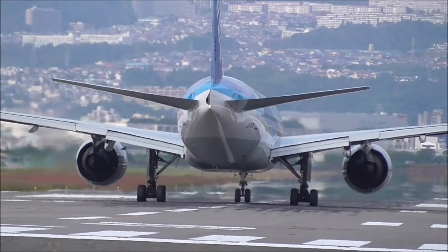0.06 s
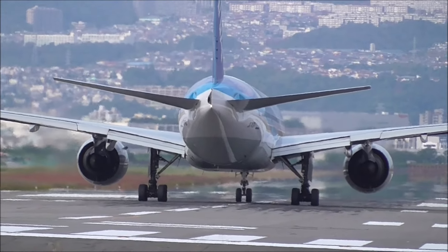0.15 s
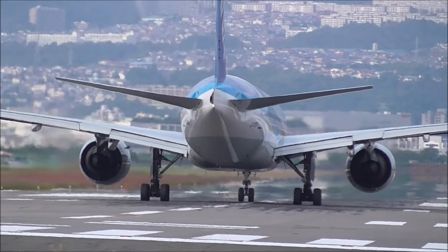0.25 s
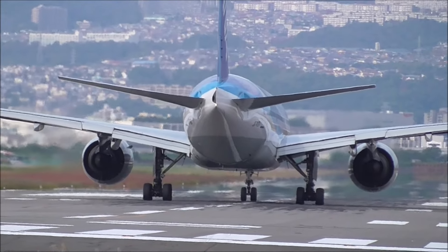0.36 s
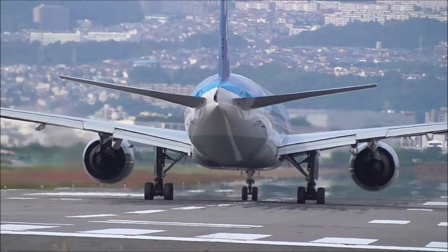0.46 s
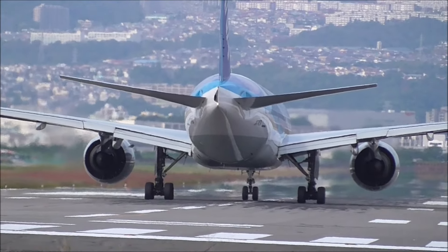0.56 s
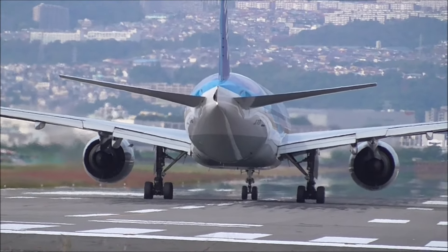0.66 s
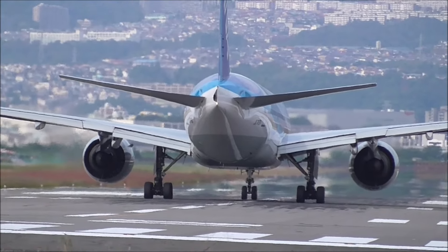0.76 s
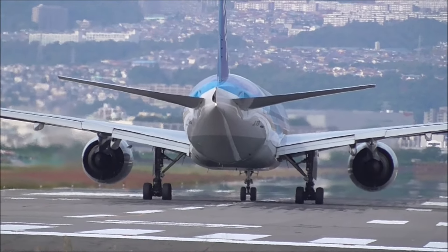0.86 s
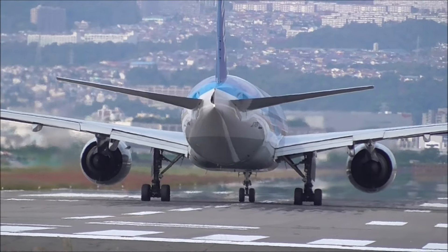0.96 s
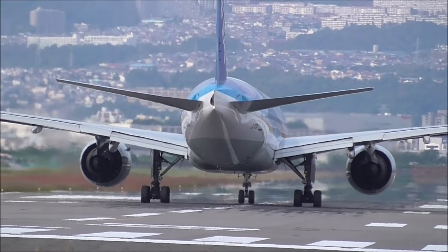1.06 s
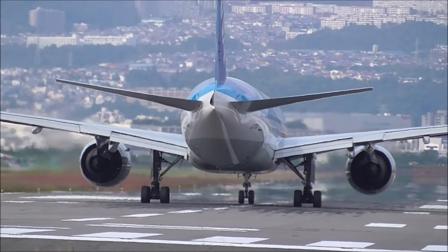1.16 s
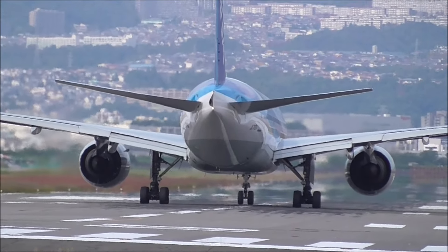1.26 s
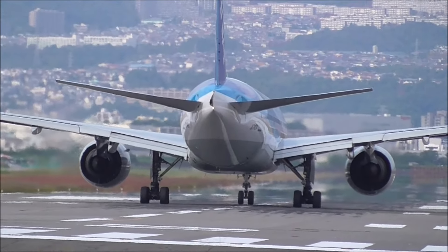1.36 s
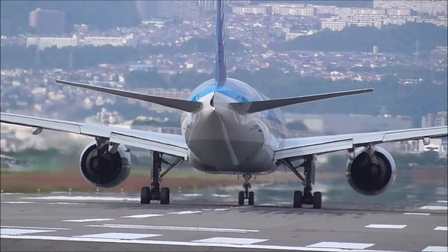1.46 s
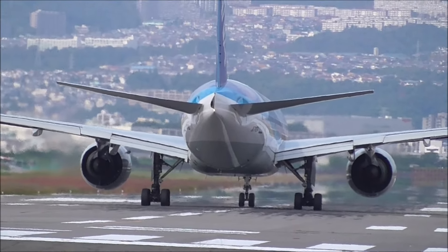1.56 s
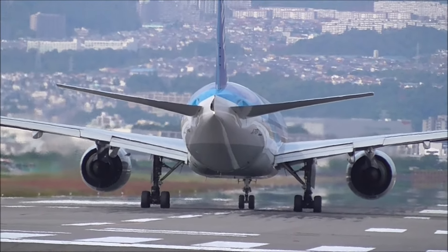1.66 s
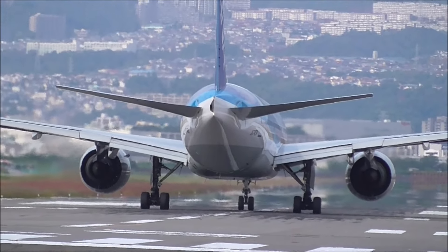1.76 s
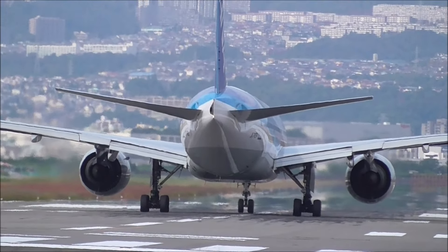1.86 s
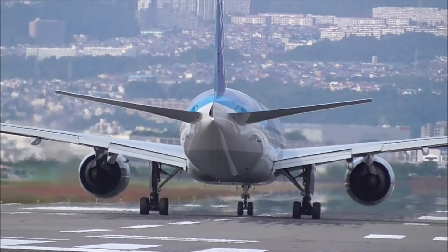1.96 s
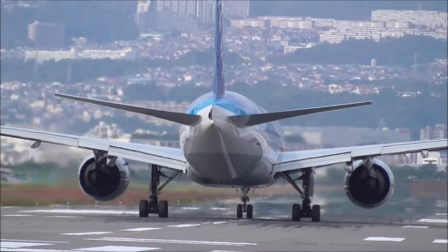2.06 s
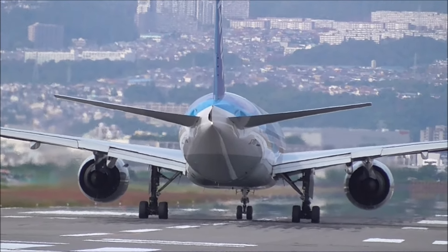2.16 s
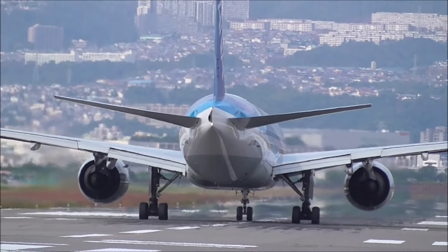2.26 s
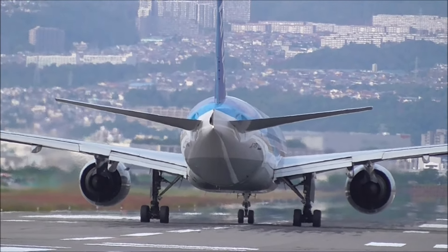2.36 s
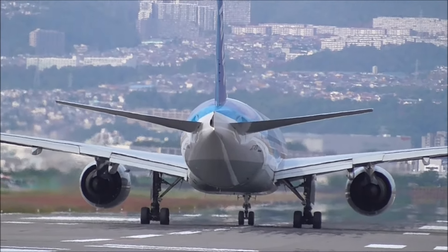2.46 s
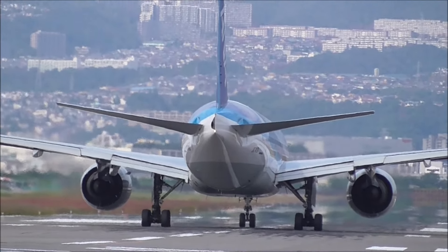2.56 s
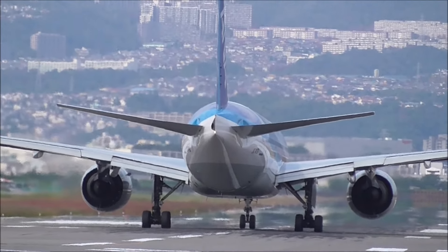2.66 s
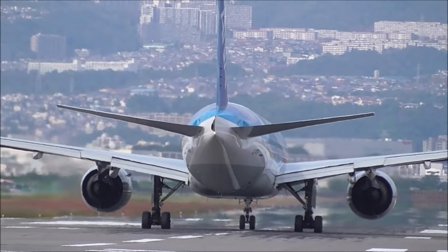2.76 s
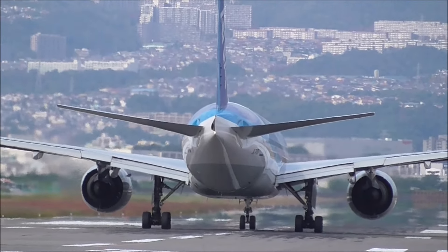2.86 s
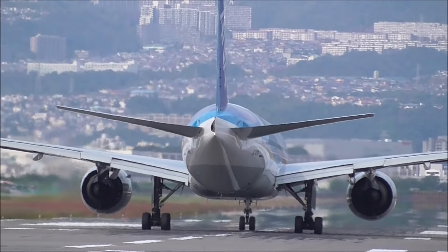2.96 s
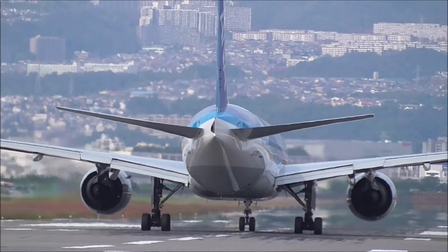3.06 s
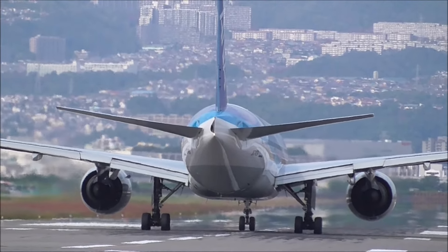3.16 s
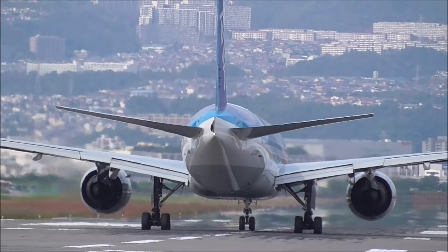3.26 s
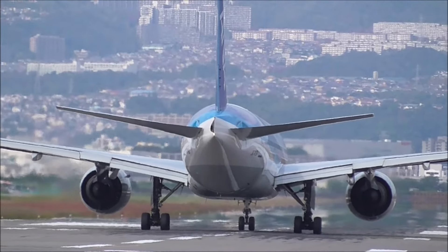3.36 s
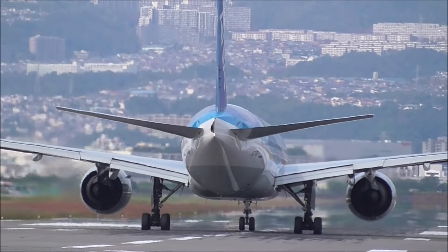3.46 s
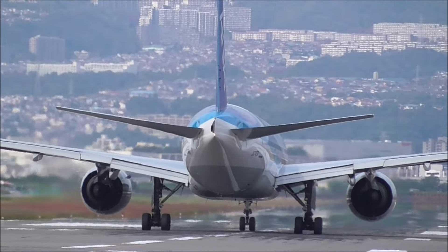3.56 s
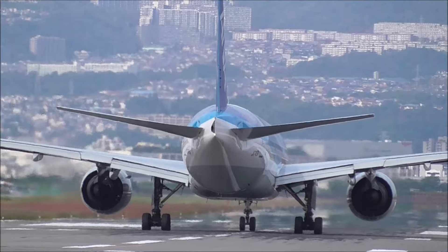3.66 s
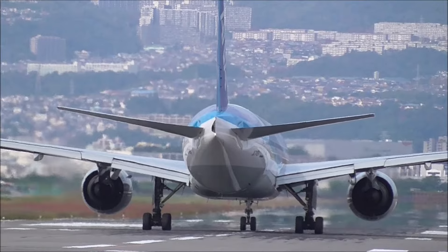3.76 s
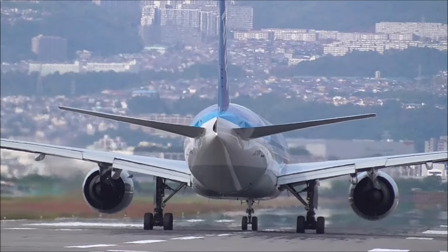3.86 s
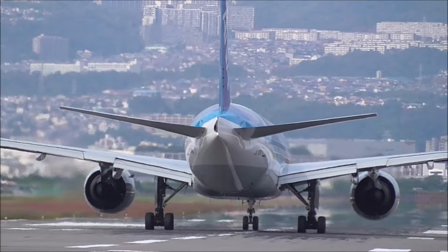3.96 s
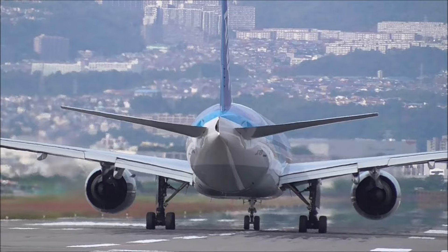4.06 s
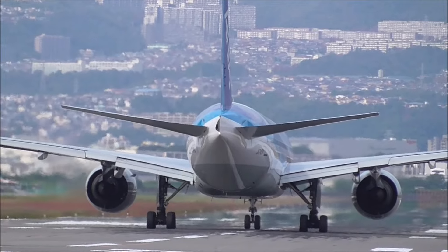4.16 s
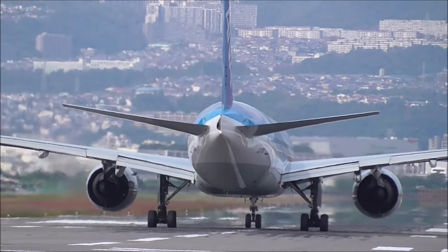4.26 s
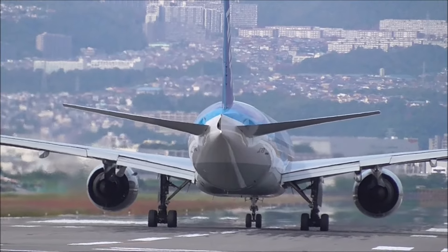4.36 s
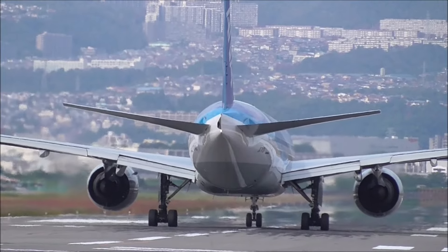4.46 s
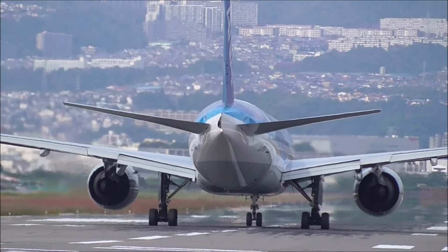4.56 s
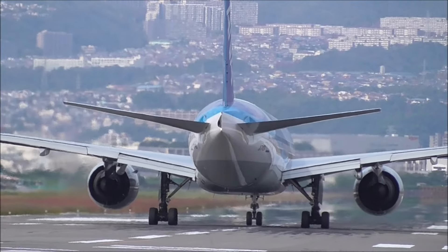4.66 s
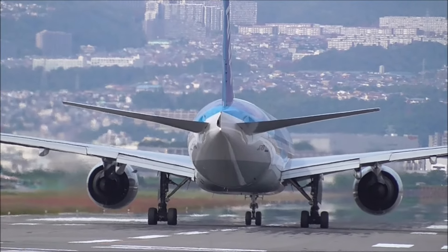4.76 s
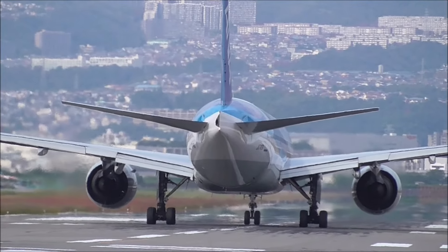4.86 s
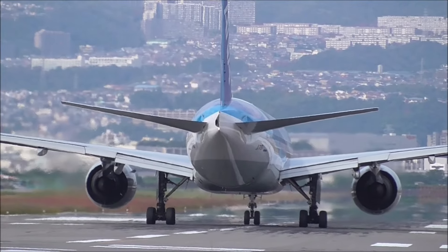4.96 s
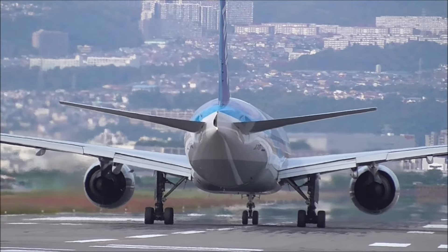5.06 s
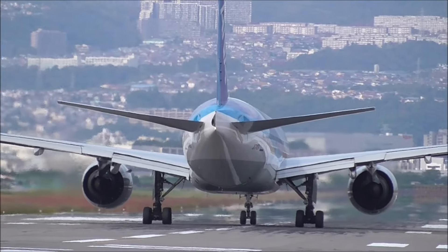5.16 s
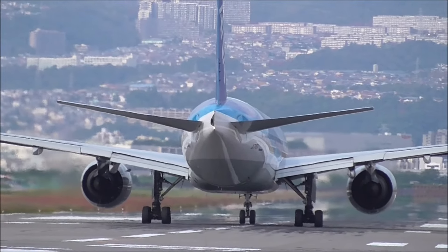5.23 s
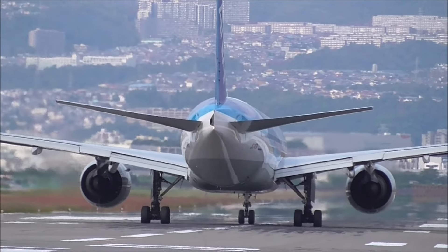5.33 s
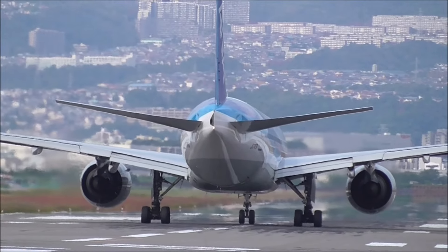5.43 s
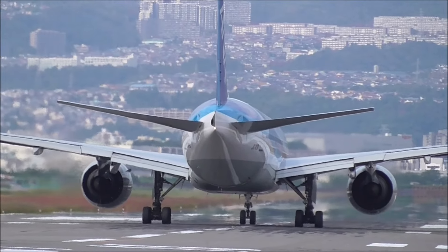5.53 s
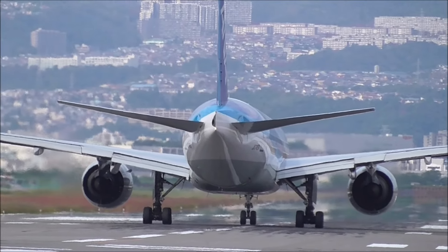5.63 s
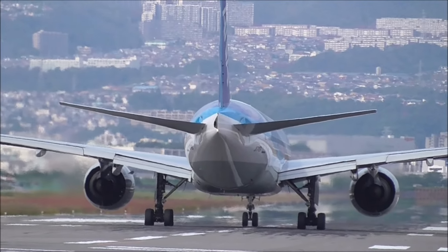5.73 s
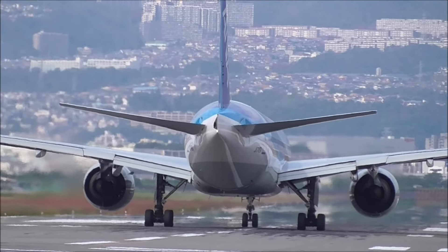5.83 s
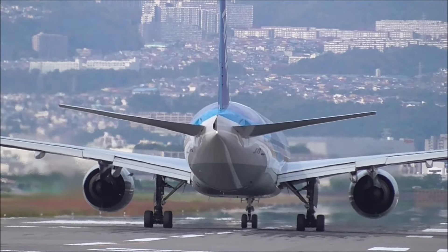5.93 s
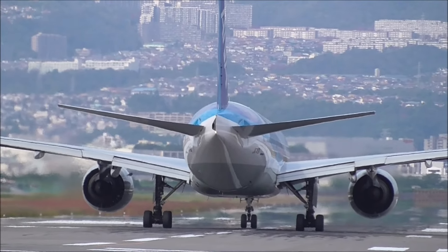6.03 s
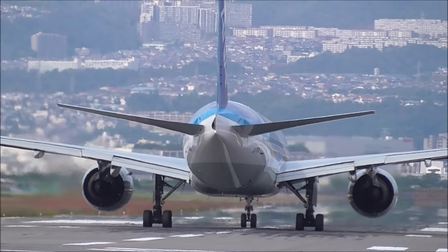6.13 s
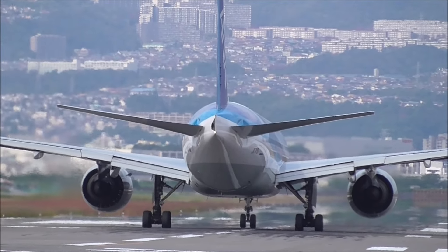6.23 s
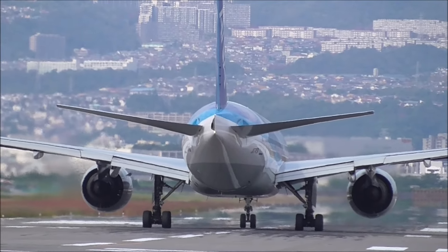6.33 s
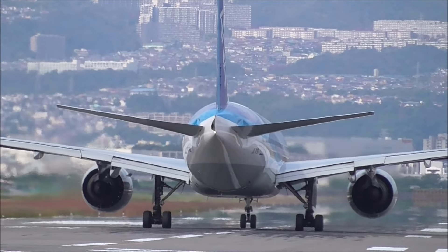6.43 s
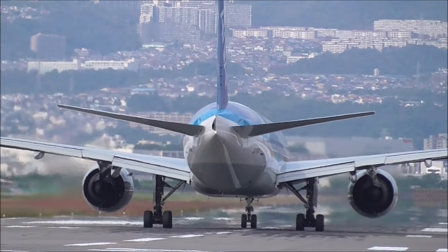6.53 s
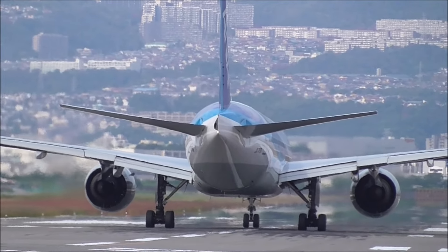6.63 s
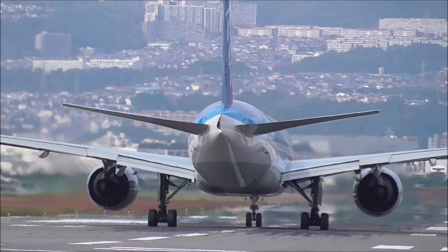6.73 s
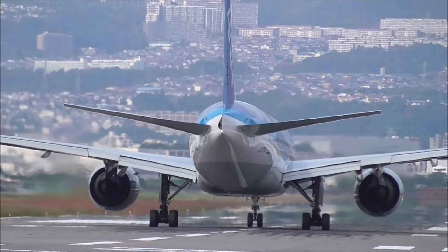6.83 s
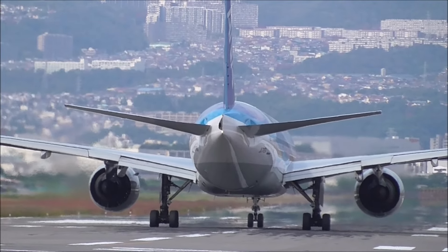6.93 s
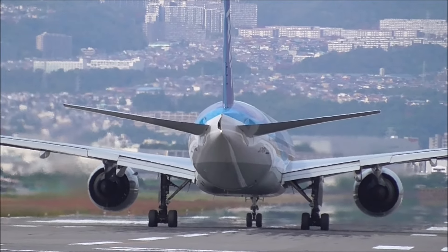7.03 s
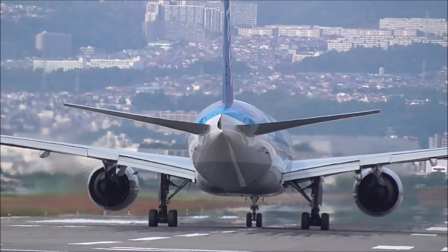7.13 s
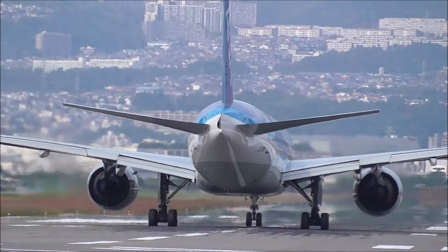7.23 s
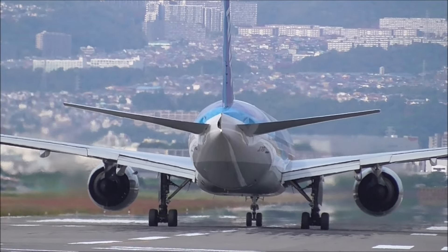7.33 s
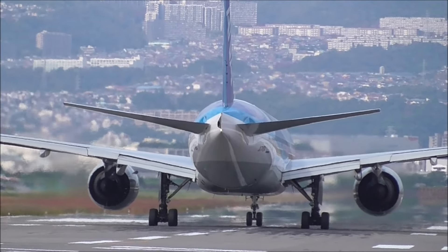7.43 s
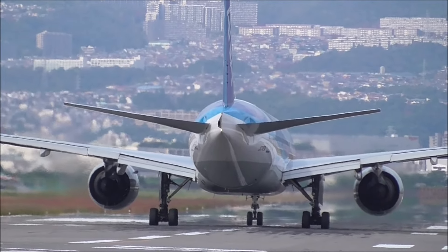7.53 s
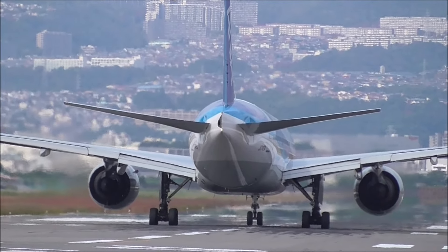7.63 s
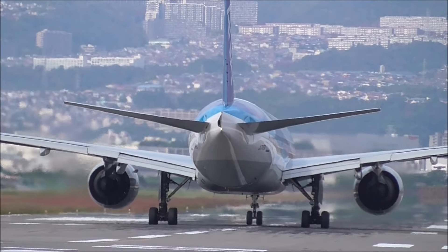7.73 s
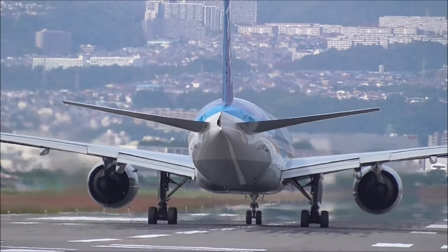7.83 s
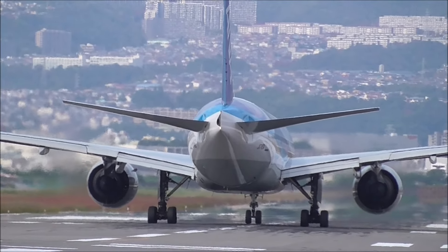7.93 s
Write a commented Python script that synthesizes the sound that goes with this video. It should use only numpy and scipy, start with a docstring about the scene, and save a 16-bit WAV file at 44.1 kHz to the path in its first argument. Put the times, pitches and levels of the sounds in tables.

```python
"""A runway, heard from far behind a twin-engine airliner that lines up and begins to spool up.
Each engine drones on a fundamental and its octave, the two slightly apart in pitch, over filtered-noise
exhaust roar; a lower howl breaks out late, and a faint turbine whine climbs as the roar swells.
Close to, gusts and single eddies buffet mostly the left microphone port, something ticks lightly,
and a faint steady hiss lies under it all."""
import sys
import numpy as np
from scipy import signal
from scipy.fft import rfft, irfft, next_fast_len
from scipy.io import wavfile
from scipy.ndimage import uniform_filter1d, map_coordinates

SR = 44100
rng = np.random.default_rng(int(sys.argv[2]) if len(sys.argv) > 2 else 0)


def log_audio(samples):
    """Write samples as a 16-bit WAV file to the path given in sys.argv[1]."""
    # one column per channel
    frames = np.atleast_2d(samples).T
    # limit to full scale, then quantise
    limited = np.clip(frames, -1, 1)
    pcm = np.round(limited * 32767).astype(np.int16)
    wavfile.write(sys.argv[1], SR, pcm)


N = 352359

# Noise colours, far sources and hiss: [f/Hz, relative level/dB]
HISS_COLOUR = [(3000, -2.8), (6200, -2.5), (7200, 3.2), (8400, 3.4), (9400, 4.6), (10400, 4.6), (11200, 1),
               (13200, 3.9), (14200, -0.3), (15700, -2)]
DEEP_COLOUR = [(15, -36.5), (28, -19), (42, -9), (60, -1), (85, 1), (115, 2), (160, -0.5), (250, -10),
               (600, -45), (1800, -90)]
RUMBLE_COLOUR = [(30, -40), (80, -18.5), (130, -5), (170, 0), (220, 1.5), (290, -1.4), (380, -4.7),
                 (480, -9.2), (700, -29.5), (1200, -73.5)]
ROAR_COLOUR = [(250, -36), (400, -11.5), (490, -4.5), (590, -0.5), (660, 0.5), (720, -5.2), (810, -8.5),
               (900, -18.2), (1050, -34.5), (1800, -67.5)]
FAN_COLOUR = [(600, -23.5), (900, -2.5), (1030, -3), (1380, 1), (1510, 0), (1700, -5.5), (2000, -0.5),
              (2240, -3.2), (2400, -9.5), (2750, -10.5), (3050, -5.5), (3500, -7), (4400, -15.3),
              (5200, -21.5), (6200, -41)]
# Noise colours, close to the microphone: [f/Hz, relative level/dB]
BREEZE_COLOUR = [(15, -27.5), (35, -11.5), (70, -0.5), (120, 3.5), (170, 4.5), (260, -4.5), (400, -7),
                 (650, -21), (1200, -58)]
GUST_COLOUR = [(15, -30.5), (50, -11), (110, -10.5), (240, 1.5), (340, -2), (500, -14.5), (720, -19.5),
               (1000, -27), (2000, -68)]
TICK_COLOUR = [(1500, -35), (2800, -11), (3400, 7), (4000, -4), (4600, -3), (5300, -18), (6200, -22),
               (7800, -13.5), (10000, -25), (15000, -33)]

# Likeness of the two ports; below 0 they move in opposite senses: [f/Hz, correlation]
PORT_LIKENESS = [(50, 0.97), (300, 0.95), (650, 0.98), (1050, 0.81), (1500, 0.9), (2100, 0.96),
                 (2500, 0.86), (3100, 0.97), (3600, 0.88), (4300, 0.43), (4900, -0.22), (6500, -0.9),
                 (7300, -0.19), (8200, -0.42), (9300, .5), (11500, .3), (13000, .2), (15000, .2)]
# Level difference between the ports: [f/Hz, left minus right level/dB]
PORT_LEAN = [(100, -0.5), (320, -0.4), (560, -2.4), (800, -1.4), (1300, -2.4), (2500, 0), (4500, 3),
             (8000, -1), (13000, 0)]
# Phase difference between the ports: [f/Hz, lead of the left/rad]
PORT_SKEW = [(60, 0), (350, -0.19), (900, -0.06), (1300, .18), (2100, 0.087), (3000, 0), (3800, -0.075),
             (4300, 0.88), (5000, -0.11)]

# Light ticks near the microphone: [t/s, nominal peak level/dB, ring against scrape level/dB]
TICKS = [(4.8636, -33, -12), (5.8546, -38, -4), (5.8754, -29.5, 2.5)]
# Gusts at the microphone: [start t/s, hold t/s, buffet level before the port gains/dB]
GUSTS = [(0.12, 0.45, -48), (0.35, 0.2, -38.5), (0.84, 0.8, -49), (1.53, 0.08, -44), (1.7, 0.17, -44),
         (2.06, 0.06, -45), (2.22, 0.2, -49), (3.46, 0.2, -43), (3.8, 0.15, -46), (3.98, 0.27, -41),
         (4.45, 0.42, -40), (5.1, 0.7, -38.5), (5.271, 0.07, -34.5), (5.44, 0.16, -43), (5.86, 0.2, -47),
         (6.49, 0.04, -43), (6.68, 0.1, -45), (6.78, 0.04, -37), (6.96, 0.24, -38.5), (7.301, 0.3, -36.5),
         (7.66, 0.33, -50)]
# Single eddies that thump the ports: [t/s, peak level on the left/dB, width t/s]
EDDIES = [(1.57, -28, .002), (3.509, -26.5, .0019), (3.625, -25, .0019), (3.654, -28.5, .0018),
          (3.838, -29, .0018), (3.968, -28.5, .0018), (4.266, -22.5, .0021), (4.753, -28, .0015),
          (4.87, -27, .0014), (5.212, -24, .0009), (5.259, -19, .0009), (5.267, -16.5, .0007),
          (5.2953, -11.8, .00087), (5.3068, -16.5, .001), (5.324, -19, .00069), (5.33, -20, .0007),
          (5.581, -24, .0009), (5.635, -16, .00096), (5.64, -18.5, .0009), (5.662, -23, .001),
          (5.715, -21, .0007), (5.7725, -18, .0013), (5.779, -19.5, .001), (5.804, -22, .001),
          (6.503, -26, .0015), (6.783, -22, .0016), (6.796, -24.5, .0014), (6.823, -25.5, .0014)]

# Surges of the deep rumble: [peak t/s, half length t/s, peak level/dB]
SURGES = [(1.64, 0.1, -46), (2.9, 0.2, -52), (3.96, 0.05, -44), (4.11, 0.04, -44)]
# Reference level for the mid roar and the drones' octaves: [t/s, level/dB]
ROAR_LEVEL = [(0, -41.2), (0.3, -44.0), (0.8, -42.1), (1.8, -40.5), (2.25, -43.2), (3.15, -40.3),
              (3.7, -42.8), (4.6, -41.2), (5.45, -43.2), (6.0, -40.8), (6.6, -39.2), (7.1, -35),
              (7.65, -32.6), (7.98, -32.9)]
# Level laws of the layers: [idle level/dB, gain by lining up/dB, gain by spooling up/dB]
RUMBLE_LAW = (-47.5, 5.5, 8.6)
FAN_LAW = (-52, 1.3, 3.6)
HUM_LAW = (-52.3, 1.3, 2.6)
WHINE_LAW = (-70.5, 6.5, 5.5)
# Engine drones by name: [idle f/Hz, sag with spool f/Hz, level law of the fundamental/dB,
# octave against the roar reference level/dB]
DRONES = {"first": (320.9, 3.4, (-52.3, -1.2, 10), -4.4), "second": (327.1, 3.5, (-54.5, 3, -2), -15)}
# Swells of a drone's partials: [drone, partial 1 or 2, peak t/s, half length t/s, peak level/dB]
SWELLS = [("first", 1, 0.7, 0.25, -54), ("second", 1, 1.9, 0.3, -53), ("second", 2, 1.78, 0.18, -46),
          ("first", 1, 2.66, 0.2, -47), ("first", 1, 3.0, 0.12, -48), ("second", 2, 3.1, 0.2, -44),
          ("howl", 2, 3.5, 0.55, -51), ("second", 1, 3.76, 0.36, -43.5), ("second", 1, 4.75, 0.5, -44.3),
          ("second", 1, 5.28, 0.22, -44.5), ("second", 2, 6.25, 0.45, -44.5),
          ("first", 1, 6.44, 0.22, -36.3), ("first", 1, 6.73, 0.08, -37), ("second", 1, 6.85, 0.3, -47),
          ("first", 1, 6.9, 0.095, -31), ("first", 1, 7.305, 0.075, -26), ("first", 1, 7.44, 0.105, -27),
          ("howl", 1, 7.635, 0.075, -28.5), ("first", 1, 7.75, 0.1, -34), ("first", 1, 7.95, 0.15, -30.5),
          ("howl", 1, 7.865, 0.045, -31), ("howl", 1, 7.97, 0.07, -27.5)]

LINE_UP_S = 6.1  # over this time the tail swings slowly towards the listener
THROTTLE_S, SPOOL_S = 6.05, 1.9  # the throttles open; spool speed goes from 0 to 1 over SPOOL_S
WHINE_HZ, WHINE_RISE_HZ = 1461, 175  # pitch at idle, and its rise with spool speed
DRIFT_HZ, DRIFT_KNOTS_PER_S = 0.25, 1.5  # slow wander of each engine's pitch
HOWL_HZ, HOWL_BEND_HZ, HOWL_BEND_S = 282.3, 4.2, 0.2
HOWL_START_S, HOWL_ATTACK_S = 7.59, 0.05
HOWL_OCTAVE_DB, HOWL_FADE_DB_PER_S = -30.5, 6
GUST_ATTACK_S, GUST_RELEASE_S, CALM_DB = 0.045, 0.03, -63
EDDY_RIGHT_DB, EDDY_WIDE_S = -9, 0.002  # right port against left, for an eddy of this width
TICK_RING_HZ, TICK_RISE_S = 3450, 0.002
TOP_HZ = 15720


def amp(db):
    """Decibels to gain."""
    return 10 ** (np.asarray(db) / 20)


def unit(x):
    """Scale to rms 1."""
    return x / np.sqrt(np.mean(x ** 2) + 1e-20)


def times():
    """The time of every sample, in seconds."""
    return np.arange(N) / SR


def ramp(start_s, length_s):
    """0 before start_s, then a straight climb to 1."""
    return np.clip((times() - start_s) / length_s, 0, 1)


def bell(peak_s, half_s):
    """A smooth swell that reaches 1 at peak_s."""
    return np.exp(-((times() - peak_s) / half_s) ** 2)


def along(points, hz):
    """(f/Hz, value) points read on a log frequency axis."""
    f, value = np.transpose(points)
    return np.interp(np.log(hz + 1), np.log(f + 1), value)


def wobble(rate):
    """A smooth random curve with rate knots a second."""
    knots = rng.standard_normal(4096)
    coarse_samples = np.arange(0, N, 32)
    coarse = map_coordinates(knots, [coarse_samples * rate / SR], mode="wrap")
    return np.interp(np.arange(N), coarse_samples, coarse)


def filtered(x, response):
    """x with its spectrum multiplied by a response of frequency."""
    size = next_fast_len(N + SR // 4)
    hz = np.fft.rfftfreq(size, 1 / SR)
    return irfft(rfft(x, size) * response(hz), size)[..., :N]


def noise(colour):
    """Two unrelated coloured noises of rms 1."""
    white = rng.standard_normal((2, N))
    return unit(filtered(white, lambda hz: amp(along(colour, hz))))


def turbulence(colour, patchy_db, frames=14):
    """Stereo noise of rms 1; moving air lifts and sinks patches of its spectrum, each frames long."""
    spectrum = signal.stft(noise(colour), nperseg=1024)[2]
    field = rng.standard_normal(spectrum.shape[1:])
    field = uniform_filter1d(field, size=7, axis=0)
    field = uniform_filter1d(field, size=frames, axis=1)
    pair = signal.istft(spectrum * amp(patchy_db * unit(field)), nperseg=1024)[1][:, :N]

    def mid_side_gains(hz):
        # this split gives the two ports their likeness as a correlation
        angle = np.arccos(np.clip(along(PORT_LIKENESS, hz), -1, 1)) / 2
        return np.array([np.cos(angle), np.sin(angle)])

    mid, side = filtered(pair, mid_side_gains)
    return unit(np.array([mid + side, mid - side]))


def hiss():
    """Faint steady hiss: high coloured noise with slight spectral patches."""
    return amp(-68.2) * turbulence(HISS_COLOUR, patchy_db=0.5)


def ticks():
    """Light taps close by: a noise scrape and a short sine ring swell and die within milliseconds."""
    t = times()
    scrape, ring = np.zeros(N), np.zeros(N)
    for s, db, ring_db in TICKS:
        age = np.maximum(t - s, 0) / TICK_RISE_S
        # noise peaks stand well above its rms, so the envelope sits lower
        envelope = amp(db - 12.3) * age * np.exp(1 - age)
        scrape += envelope
        ring += amp(ring_db) * envelope
    return scrape * noise(TICK_COLOUR) + ring * np.sin(2 * np.pi * TICK_RING_HZ * t)


def gust_level():
    """The wind's dB over time: each gust rises, holds and dies away over a faint breeze."""
    power = amp(CALM_DB) ** 2
    for s, hold_s, db in GUSTS:
        rise = ramp(s - GUST_ATTACK_S, GUST_ATTACK_S)
        fade = np.exp(-np.maximum(times() - s - hold_s, 0) / GUST_RELEASE_S)
        power = power + (amp(db) * rise * fade) ** 2
    return 10 * np.log10(power)


def buffeting():
    """Wind noise, mostly on the left port; harder gusts move from the breeze's colour to the gust's."""
    wind_db = gust_level()
    hard = np.clip((wind_db + 39.5) / 9, 0, 1)
    flow = np.sqrt(1 - hard) * noise(BREEZE_COLOUR) + np.sqrt(hard) * noise(GUST_COLOUR)
    port_gains = amp([[1.5], [-8]])  # left, right
    return amp(wind_db + 1.8 * wobble(45)) * flow * port_gains


def eddies():
    """Each passing eddy is one push of pressure between two suctions; wider ones reach the right more."""
    t = times()
    thumps = np.zeros((2, N))
    for s, db, width in EDDIES:
        u = (t - s) / width
        near = np.abs(u) < 6
        push = (1 - u[near] ** 2) * np.exp(-u[near] ** 2 / 2)
        right = amp(EDDY_RIGHT_DB) * (width / EDDY_WIDE_S) ** 2
        thumps[:, near] += np.array([[1], [right]]) * amp(db) * push
    return thumps


def wind():
    """Air at the microphone: broad buffeting plus the thumps of single eddies."""
    return buffeting() + eddies()


def spool():
    """Engine speed, climbing steadily from 0 at idle to 1."""
    return ramp(THROTTLE_S, SPOOL_S)


def level(law):
    """A layer's dB over time: it shifts as the tail swings round and as the engines spool up."""
    idle_db, line_up_db, spool_db = law
    return idle_db + line_up_db * ramp(0, LINE_UP_S) + spool_db * spool()


def roar_level():
    """The roar reference dB at every sample."""
    return np.interp(times(), *np.transpose(ROAR_LEVEL))


def deep_rumble():
    """The lowest exhaust noise wanders in level, with brief surges added in power."""
    surges = sum(amp(db) * bell(s, half_s) for s, half_s, db in SURGES)
    gain = np.hypot(amp(-47.8 + 0.7 * wobble(3.04)), surges)
    return gain * turbulence(DEEP_COLOUR, patchy_db=2.0)


def jets():
    """Jet turbulence: a rumble that swells with thrust and a mid roar on its own level curve."""
    rumble = amp(level(RUMBLE_LAW)) * turbulence(RUMBLE_COLOUR, patchy_db=0.74)
    roar_db = roar_level() - 1.4 + 0.48 * wobble(7.3)
    return rumble + amp(roar_db) * turbulence(ROAR_COLOUR, patchy_db=1.1)


def fans():
    """The fans' higher rush: noise with shorter patches that grows with spool speed."""
    fan_db = level(FAN_LAW) + 0.3 * wobble(7)
    return amp(fan_db) * turbulence(FAN_COLOUR, patchy_db=1.2, frames=8)


def tone(pitch_hz, scatter, flutter_rate):
    """A far tone of rms 1: a steady direct wave plus a part scattered by turbulent air."""
    carrier = np.exp(2j * np.pi * np.cumsum(pitch_hz) / SR)
    scattered = wobble(flutter_rate) + 1j * wobble(flutter_rate)
    return unit(np.real(carrier * (1 + scatter * scattered)))


def hum():
    """A low steady-pitched hum, its level strongly fluttered by scattering."""
    return amp(level(HUM_LAW)) * tone(np.full(N, 113.0), scatter=0.5, flutter_rate=6)


def whine():
    """A turbine whine climbs with spool speed beside a fainter one of fixed pitch."""
    pitch_hz = WHINE_HZ + WHINE_RISE_HZ * spool()
    climbing = amp(level(WHINE_LAW)) * tone(pitch_hz, scatter=2.2, flutter_rate=80)
    steady = amp(-68.0) * tone(np.full(N, 1375.0), scatter=1.0, flutter_rate=30)
    return climbing + steady


def drone(pitch_hz, low, octave, scatter):
    """A fundamental and its octave, each with its own gain and scattering."""
    fundamental = low * tone(pitch_hz, scatter, flutter_rate=16)
    return fundamental + octave * tone(2 * pitch_hz, scatter, flutter_rate=22)


def swells(name, partial):
    """The bell-shaped swells of one partial of a drone, summed in power, as a gain."""
    power = sum((amp(db) * bell(s, half_s)) ** 2
                for which, k, s, half_s, db in SWELLS if (which, k) == (name, partial))
    return np.sqrt(power)


def howl():
    """A lower drone bends up late as its octave jumps in and fades; both partials also swell."""
    pitch_hz = HOWL_HZ + HOWL_BEND_HZ * ramp(HOWL_START_S, HOWL_BEND_S)
    fade_db = HOWL_FADE_DB_PER_S * np.maximum(times() - HOWL_START_S, 0)
    outbreak = amp(HOWL_OCTAVE_DB - fade_db) * ramp(HOWL_START_S, HOWL_ATTACK_S)
    octave = outbreak + swells("howl", 2)
    return drone(pitch_hz, swells("howl", 1), octave, scatter=0.06)


def engine(name, scatter):
    """One engine's drone: its pitch drifts a little and sags ever faster as the engine spools up."""
    idle_hz, sag_hz, low_law, octave_db = DRONES[name]
    low = np.hypot(amp(level(low_law)), swells(name, 1))
    octave = np.hypot(amp(roar_level() + octave_db), swells(name, 2))
    pitch_hz = idle_hz + DRIFT_HZ * wobble(DRIFT_KNOTS_PER_S) - sag_hz * spool() ** 2
    return drone(pitch_hz, low, octave, scatter)


def aircraft():
    """Exhaust and fan noise under the tones; the two engines' drones beat against each other."""
    air = deep_rumble() + jets() + fans()
    drones = engine("first", scatter=0.07) + engine("second", scatter=0.08)
    return air + hum() + whine() + howl() + drones


def scene():
    """The far aircraft and the hiss, slightly off centre, with ticks and wind at the microphone."""
    ports = np.array([[0.5], [-0.5]])  # half of each difference goes to either port

    def placement(hz):
        return amp(ports * along(PORT_LEAN, hz)) * np.exp(1j * ports * along(PORT_SKEW, hz))

    return filtered(hiss() + aircraft(), placement) + ticks() + wind()


def record(dry):
    """The recorder keeps nothing above its band limit."""
    return filtered(dry, lambda hz: hz < TOP_HZ)


dry = scene()
out = record(dry)
log_audio(out)
```